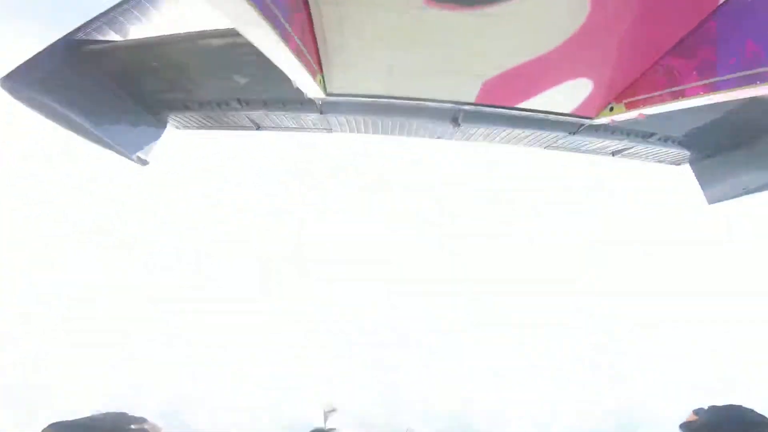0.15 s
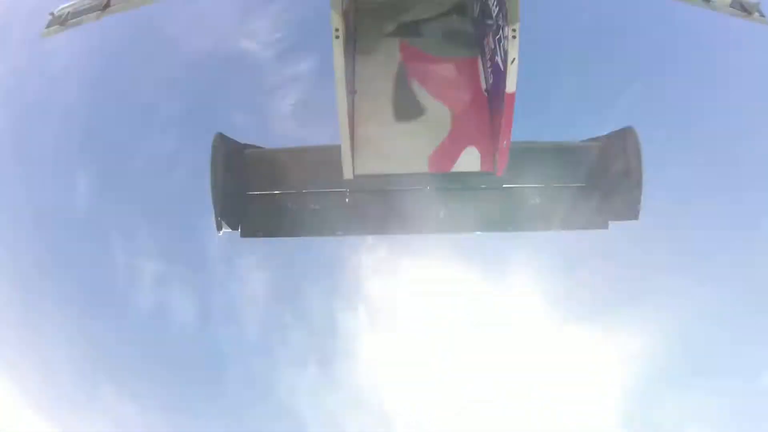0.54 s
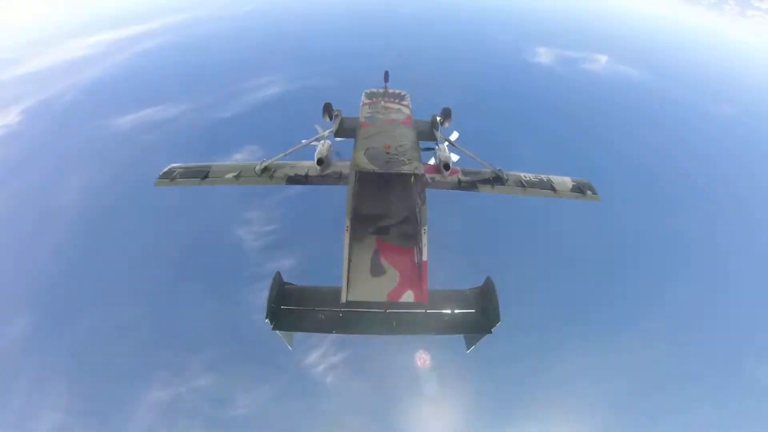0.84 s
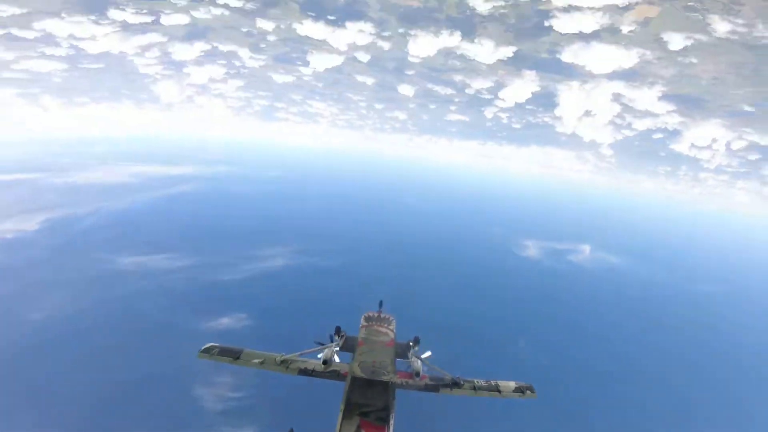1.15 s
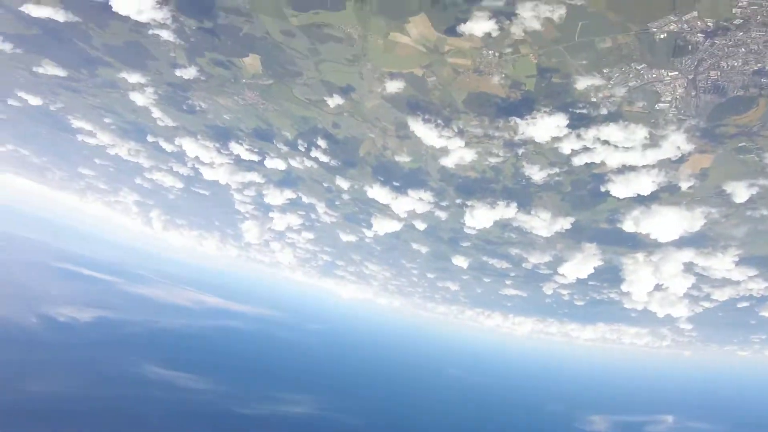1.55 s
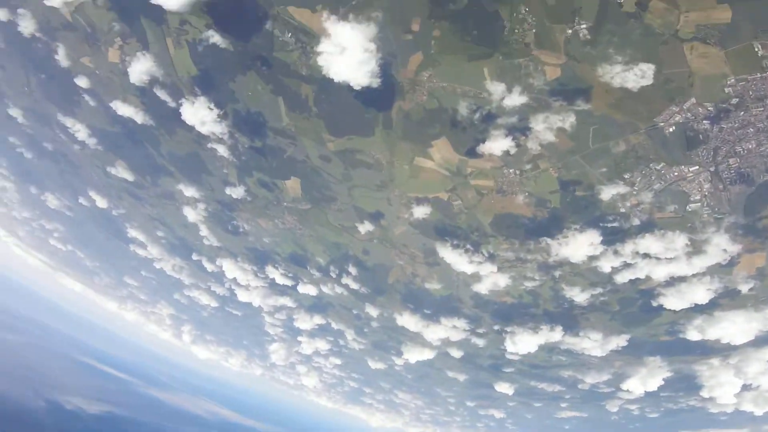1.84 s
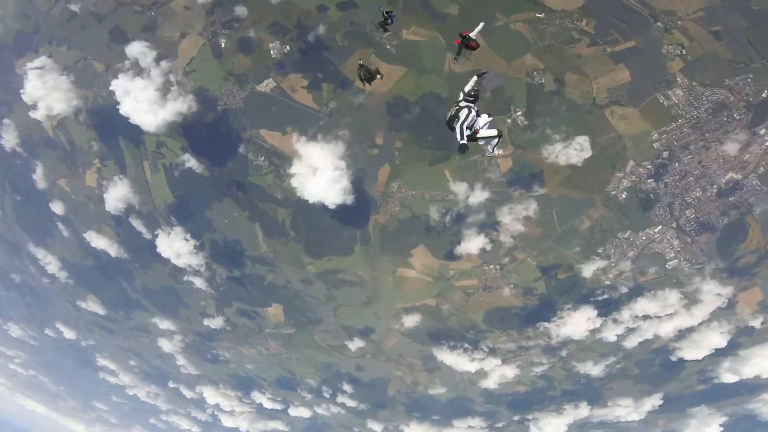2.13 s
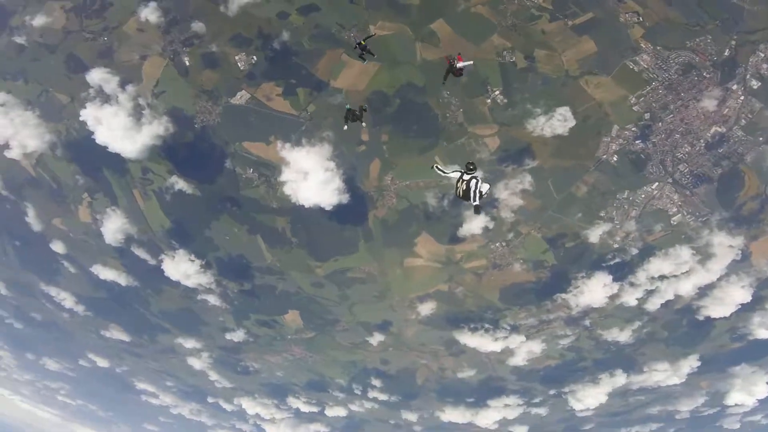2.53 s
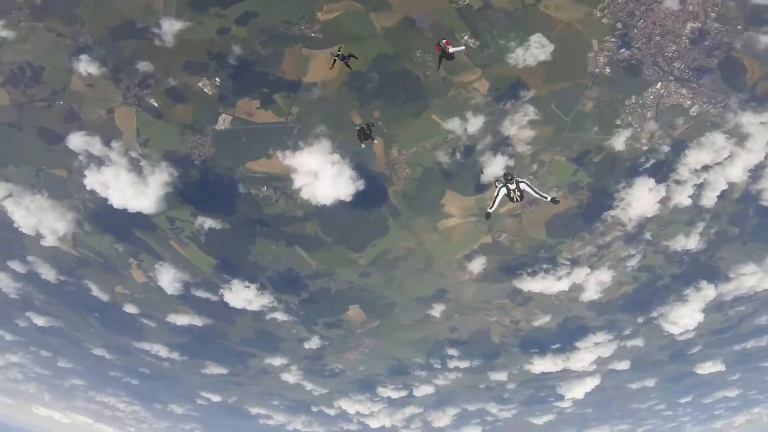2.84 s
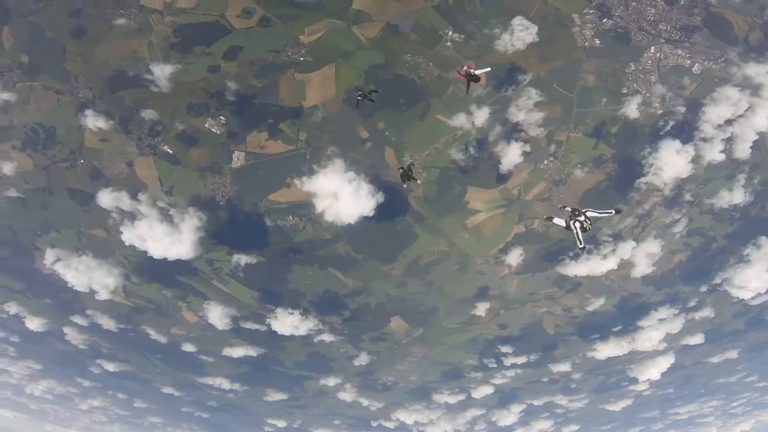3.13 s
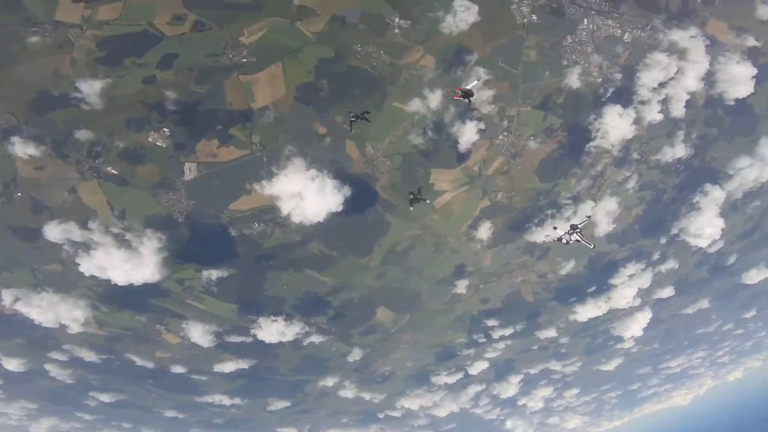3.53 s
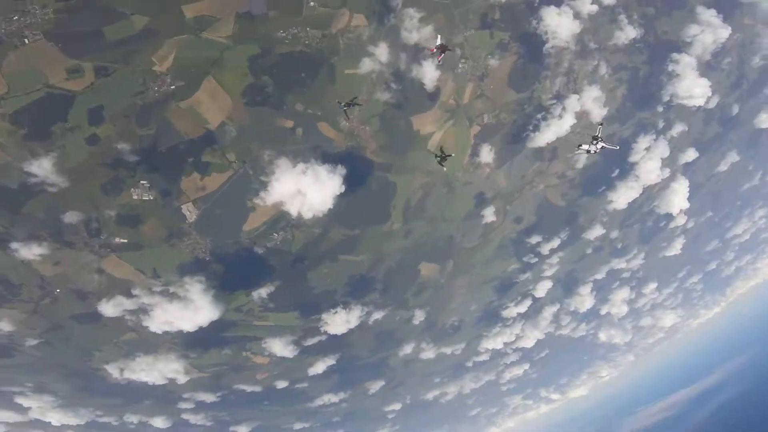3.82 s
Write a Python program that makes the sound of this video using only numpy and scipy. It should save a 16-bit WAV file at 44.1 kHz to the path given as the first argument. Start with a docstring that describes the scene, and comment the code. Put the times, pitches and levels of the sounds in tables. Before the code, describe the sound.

Strong wind buffets a skydiver's helmet microphone, with a cluster of snaps and low thuds in the first 0.3 seconds. It eases until about 0.7 seconds, then builds, with a hollow falling roar and a few slaps around 1.2 seconds. From 1.7 seconds it roars and hisses in dense gusts, thudding near 2.8 and 3.4 seconds. A higher, hollow rush swells around 3.8 seconds.

```python
"""Off an aircraft's tail ramp and tumbling into freefall, heard from one helmet camera microphone right
in the airstream. Eddies of all sizes beat on its port: big ones buffet, small ones roar and hiss, coming
in gusts and bursts as the head turns. Air blowing across the port adds a hollow roar. Sudden slaps of
pressure snap and thud, one thin tick sounds, and the camera rounds the loudest buffets."""
import sys
import numpy as np
from scipy import signal
from scipy.fft import rfft, irfft, next_fast_len
from scipy.io import wavfile
from scipy.ndimage import uniform_filter1d

SR = 44100
rng = np.random.default_rng(int(sys.argv[2]) if len(sys.argv) > 2 else 0)


def to_wav(sig):
    """Store sig (one row per channel, or 1-D mono) as 16-bit WAV at the path in sys.argv[1].

    Samples outside -1..1 are clipped; the rate is SR.
    """
    pcm = np.clip(np.atleast_2d(sig), -1, 1) * 32767
    pcm = np.round(pcm).astype(np.int16)
    wavfile.write(sys.argv[1], SR, pcm.T)  # frames by channels


N = 175077

# Wind on the port. Each row: time in seconds, then buffeting bass, low middle, roar, rush and hiss in dB.
# Only the rise and fall within a column counts, as each is brought to the same average power.
WIND_LEVELS = [(0.0, -25, -50.5, -57, -53, -58), (0.05, -15, -19.5, -31, -40.5, -50),
               (0.08, -15, -27, -30.5, -46, -54), (0.132, -10, -17, -25.5, -40, -54),
               (0.16, -29, -28.5, -49, -54, -59), (0.19, -23.5, -15, -29.5, -53, -57),
               (0.2, -14.5, -21, -32, -43, -58), (0.26, -11, -22.5, -31.5, -37, -49.5),
               (0.32, -22.5, -26, -34.5, -41.5, -50.5), (0.39, -40, -38.5, -48, -44.5, -55),
               (0.46, -21.5, -35, -40.5, -48.5, -49), (0.49, -29.5, -43, -46.5, -46.5, -51.5),
               (0.63, -35, -40.5, -43, -42.5, -48), (0.68, -31.5, -36, -38, -40, -47),
               (0.72, -32, -34.5, -29, -36, -41.5), (0.77, -29, -31, -27, -34, -39.5),
               (0.82, -33, -27, -27, -35.5, -42.5), (0.87, -43, -29.5, -37.5, -40.5, -45),
               (0.89, -28, -24.5, -27.5, -35, -44), (0.97, -36, -31.5, -36, -41, -49),
               (1.02, -30, -25.5, -26.5, -43.5, -50.5), (1.08, -39.5, -24.5, -25.5, -39, -52),
               (1.15, -27, -17.5, -21, -35.5, -46), (1.18, -32.5, -20.5, -26.5, -39.5, -52),
               (1.2, -17.5, -17.5, -21, -38, -47.5), (1.23, -26, -14.5, -22, -34.5, -44),
               (1.27, -25, -25.5, -33.5, -45, -54.5), (1.33, -31, -19, -28.5, -30.5, -48),
               (1.35, -27, -27, -28, -44, -51), (1.39, -33, -23.5, -32, -41.5, -54),
               (1.44, -24, -18.5, -25, -32.5, -45), (1.46, -28, -27, -26.5, -30.5, -46.5),
               (1.54, -26, -23.5, -34.5, -40, -49.5), (1.61, -22, -26, -31, -38.5, -47.5),
               (1.7, -19.5, -24, -27, -34.5, -45.5), (1.74, -20.5, -21, -20.5, -30.5, -44.5),
               (1.77, -26, -29.5, -30, -36.5, -45), (1.8, -19, -15, -23.5, -29, -44),
               (1.92, -17.5, -23.5, -25.5, -30.5, -41.5), (1.97, -24, -27, -29, -31.5, -44),
               (2.0, -17, -15.5, -20, -28, -39), (2.03, -23, -22.5, -25, -34.5, -45),
               (2.12, -18.5, -17, -24.5, -30.5, -42), (2.3, -20.5, -18.5, -25, -30, -41.5),
               (2.45, -20.5, -22, -26.5, -30.5, -41.5), (2.59, -19, -23.5, -27, -30, -41.5),
               (2.64, -17.5, -19, -20.5, -26.5, -37), (2.77, -23, -20, -26.5, -30, -41),
               (2.85, -12.5, -23.5, -23.5, -32, -42), (2.89, -21, -20, -26.5, -33, -45.5),
               (3.0, -18.5, -17.5, -24.5, -31, -44), (3.08, -21.5, -17, -22, -31, -44),
               (3.17, -24.5, -18.5, -24, -33.5, -47.5), (3.29, -15, -16.5, -25.5, -34.5, -50),
               (3.32, -25, -25.5, -21.5, -34, -50.5), (3.37, -16.5, -16.5, -23, -39.5, -49),
               (3.39, -16.5, -25, -23, -30, -48), (3.41, -11, -27.5, -25.5, -41, -55),
               (3.46, -26.5, -22, -17.5, -27.5, -41.5), (3.57, -28, -22.5, -29.5, -36.5, -50.5),
               (3.64, -33, -21, -30, -41, -53), (3.74, -29, -25, -20.5, -26.5, -39.5),
               (3.87, -23, -23.5, -16, -26.5, -35.5), (3.94, -38.5, -27, -18, -28.5, -36.5),
               (3.97, -31, -34.5, -33, -28.5, -40)]
# The frequency in Hz at which each of those five levels rules.
LEVEL_CENTRES_HZ = (70, 310, 1050, 2800, 5600)
# Long-term colour of the wind through the port. Each row: frequency in Hz, relative density in dB.
WIND_COLOUR = [(15, -29.5), (25, -8), (63, 0), (129, 0), (210, -2), (335, -5.5), (425, -7.5), (472, -7),
               (616, -9.5), (991, -13), (2250, -22.5), (4250, -34), (4990, -32.5), (7030, -43.5),
               (9920, -62.5), (11500, -73), (14000, -106)]
# Unevenness of the wind. Each row: frequency in Hz, then depth of gusts, flutter, bursts, flicker in dB.
TURBULENCE_DEPTHS = [(40, -0.3, 0.1, 0.5, 0.2), (248, -0.05, 0.95, 1, 0.15),
                     (1510, -0.54, 0.44, 1.32, 0.42), (4000, 0.16, 0.03, 1.56, 0.5),
                     (9000, 0.6, 0.5, 0.6, 1.5)]
# Abrupt dips of the wind between buffets. Each row: start in seconds, end in seconds, depth in dB.
WIND_LULLS = [(0.15, 0.184, -6), (0.228, 0.243, -2.5), (3.399, 3.402, -10), (3.422, 3.432, -2)]
# Slaps of pressure on the microphone. Each row: start in seconds, snap level in dB before its low-pass,
# snap decay in seconds, snap low-pass in Hz, thud peak in dB.
PRESSURE_SLAPS = [(0.0117, -24, 0.0013, 9000, -37), (0.041, -26, .006, 2500, -25),
                  (0.0656, -26, .003, 8000, -18), (0.08, -29, .002, 7000, -23),
                  (0.094, -21, .003, 3000, -18), (0.1152, -19, .003, 3000, -24),
                  (0.1277, -18.5, .003, 2500, -18), (0.144, -26.5, .002, 7000, -24),
                  (0.189, -32.5, .004, 1500, -19), (0.205, -29, .002, 3500, -26),
                  (0.2205, -31, .003, 8000, -9), (0.263, -29, .005, 7000, -11),
                  (0.461, -28, .003, 2000, -22.5), (1.204, -15, .002, 7000, -25),
                  (1.2275, -20, .003, 6000, -25), (1.254, -18, .002, 4000, -18),
                  (1.8148, -25, .002, 4000, -17), (2.306, -12, .0015, 4500, -29),
                  (2.834, -18.5, .003, 4000, -11), (3.137, -21, .002, 8000, -20),
                  (3.2700, -25, .002, 8000, -8), (3.3915, -14, .0012, 5500, -12),
                  (3.4156, -25, .003, 7000, -8.5), (3.428, -22, .0015, 4500, -30),
                  (3.437, -18, .006, 1800, -26)]
# Colour of a snap. Each row: frequency in Hz, relative density in dB.
SNAP_SPECTRUM = [(200, -13), (600, 3), (2000, -5), (4500, -11.5), (8000, -15.5), (11000, -29), (15000, -58)]
# Air blowing across the port. Each row: middle in seconds, half length in seconds, first pitch in Hz,
# last pitch in Hz, width in Hz, steady tone over noise as a ratio, level at the middle in dB.
HOLLOW_SWELLS = [(1.115, 0.0905, 469.4, 335, 70, 1.3, -19), (1.225, 0.034, 360, 330, 110, .8, -23),
                 (3.823, 0.287, 902, 980, 404, .05, -28)]
# The thin tick. Each row: start in seconds, impulse height in dB before doubling and high-pass.
THIN_TICKS = [(3.097, -20)]

WIND_DB = -17  # rms, before the lulls
GUST_RATE, FLUTTER_RATE, BURST_RATE, FLICKER_RATE = 17, 60, 350, 23  # per second
THUD_HZ, THUD_DECAY_S = 80.7, 0.013
SNAP_RISE_S, THUD_RISE_S = 0.00051, 0.0013


def wind_on_port(burst_spike=0.22):
    """Eddies right on the microphone: half-octave bands share gusts, flutter and bursts; each flickers."""
    rows, t = np.array(WIND_LEVELS), np.arange(N) / SR
    levels = np.array([np.interp(t, rows[:, 0], column) for column in rows.T[1:]])
    levels -= 10 * np.log10(np.mean(undb(levels) ** 2, axis=1, keepdims=True))
    bursts = wander(BURST_RATE)
    bursts += burst_spike * np.maximum(bursts, 0) ** 2  # sharpen the upward swings
    gusts, flutter = wander(GUST_RATE), wander(FLUTTER_RATE)
    spectrum, hz, size = noise_spectrum(WIND_COLOUR)
    out = 0
    for centre_hz in 20 * 2 ** (np.arange(20) / 2):
        band = np.cos(np.pi / 2 * np.clip(2 * np.log2(hz / centre_hz), -1, 1)) ** 2
        # blend the two level columns nearest this band
        place = np.interp(np.log(centre_hz), np.log(LEVEL_CENTRES_HZ), np.arange(5))
        below = min(int(place), len(levels) - 2)
        db = levels[below] + (place - below) * (levels[below + 1] - levels[below])
        flicker = wander(FLICKER_RATE)
        for column, wobble in enumerate([gusts, flutter, bursts, flicker], start=1):
            db += along_hz(centre_hz, TURBULENCE_DEPTHS, column) * wobble
        out += undb(db) * irfft(spectrum * band, size)[:N]
    return at_level(out, WIND_DB)


def lull_gain(edge_s=0.0037):
    """Gain of the wind as it drops away for an instant between buffets."""
    t, db = np.arange(N) / SR, 0
    for start, end, depth_db in WIND_LULLS:
        inside_s = np.minimum(t - start, end - t)
        db += depth_db * np.clip(inside_s / edge_s + .5, 0, 1)
    return undb(db)


def pressure_slaps():
    """Each slap is a short noisy snap over a thud, the damped swing of a push on the membrane."""
    spectrum, _, size = noise_spectrum(SNAP_SPECTRUM)
    noise = at_level(irfft(spectrum, size)[:N], 0)
    out, t = np.zeros(N), np.arange(8192) / SR
    thud = np.exp(-t / THUD_DECAY_S) * np.sin(2 * np.pi * THUD_HZ * t) * np.minimum(t / THUD_RISE_S, 1)
    thud /= thud.max()
    for start, snap_db, decay_s, top_hz, thud_db in PRESSURE_SLAPS:
        i = int(start * SR)
        envelope = np.exp(-t / decay_s) * np.minimum(t / SNAP_RISE_S, 1)
        snap = noise[i:i + len(t)] * envelope
        snap *= np.sqrt(np.sum(envelope ** 2) / np.sum(snap ** 2))
        snap = signal.sosfilt(signal.butter(3, top_hz, fs=SR, output="sos"), snap)
        out[i:i + len(t)] += undb(snap_db) * snap + undb(thud_db) * thud
    return out


def hollow_roar():
    """Air across the port's cavity: swells of narrow noise around a tone that glides in pitch."""
    out, t = 0, np.arange(N) / SR
    for middle, half_s, from_hz, to_hz, width_hz, tone_ratio, db in HOLLOW_SWELLS:
        place = np.clip((t - middle) / half_s, -1, 1)
        pitch_hz = from_hz + (to_hz - from_hz) * (place + 1) / 2
        phase = 2 * np.pi * np.cumsum(pitch_hz) / SR
        narrow = signal.butter(2, width_hz / 2, fs=SR, output="sos")
        in_phase, quadrature = signal.sosfilt(narrow, rng.standard_normal((2, N)))
        roar = (in_phase + tone_ratio * in_phase.std()) * np.cos(phase) + quadrature * np.sin(phase)
        swell = np.cos(np.pi / 2 * place) ** 2
        out += swell * at_level(roar, db)
    return out


def thin_tick(low_cut_hz=2500):
    """One small click under the wind: an impulse with its bass cut away."""
    impulse = np.zeros(N)
    for start, db in THIN_TICKS:
        impulse[int(start * SR)] += 2 * undb(db)
    return signal.sosfilt(signal.butter(1, low_cut_hz, "high", fs=SR, output="sos"), impulse)


def undb(db):
    """Gain of a level in dB."""
    return 10 ** (np.asarray(db) / 20)


def at_level(x, db):
    """Scale to an rms level."""
    return x * undb(db) / np.sqrt(np.mean(x ** 2))


def wander(rate):
    """Random levels held for 1 / rate seconds and smoothed twice, with a spread of 1."""
    hold = int(SR / rate)
    steps = np.repeat(rng.standard_normal(N // hold + 1), hold)
    smooth = uniform_filter1d(uniform_filter1d(steps, hold), hold)[:N]
    return smooth / smooth.std()


def along_hz(hz, table, column=1):
    """Read a table column on a log-frequency axis."""
    table = np.array(table, float)
    return np.interp(np.log(hz), np.log(table[:, 0]), table[:, column])


def noise_spectrum(colour):
    """Spectrum of noise coloured by (Hz, dB) points, with its frequencies and transform size."""
    size = next_fast_len(N)
    hz = np.maximum(np.arange(size // 2 + 1) * SR / size, 1)
    return rfft(rng.standard_normal(size)) * undb(along_hz(hz, colour)), hz, size


def scene():
    """All that reaches the single microphone on the helmet."""
    return (wind_on_port() * lull_gain() + hollow_roar() + pressure_slaps() + thin_tick())[None]


def record(dry):
    """The camera rounds the loudest peaks and cuts the highest treble."""
    ceiling, top_hz = 0.94, 16050
    rounded = ceiling * np.tanh(dry / ceiling)
    return signal.sosfilt(signal.ellip(10, .5, 60, top_hz, fs=SR, output="sos"), rounded)


dry = scene()
out = record(dry)
to_wav(out)
```